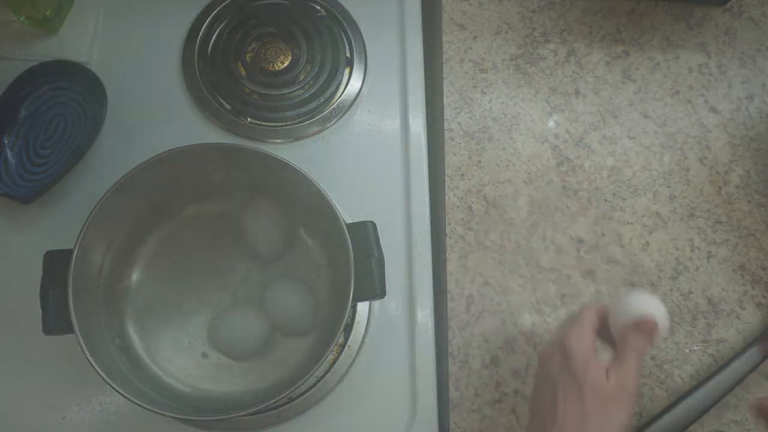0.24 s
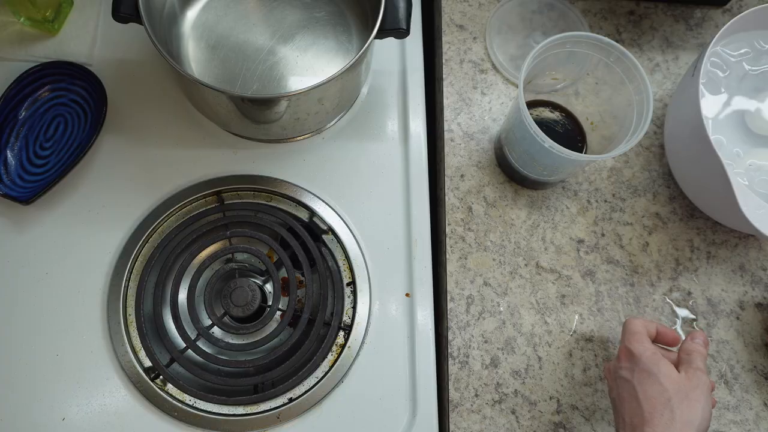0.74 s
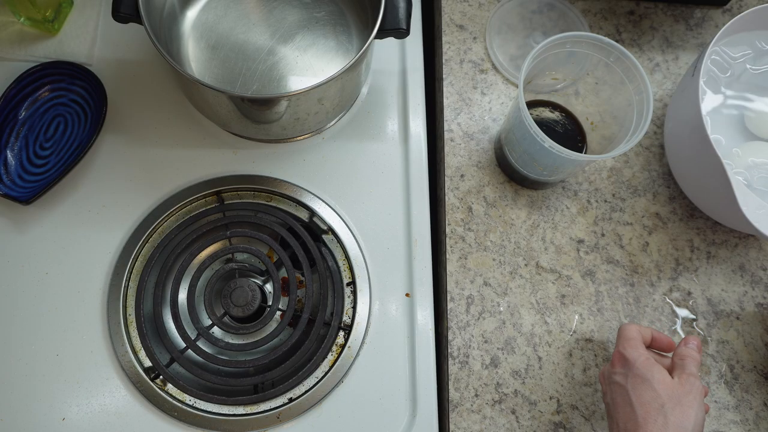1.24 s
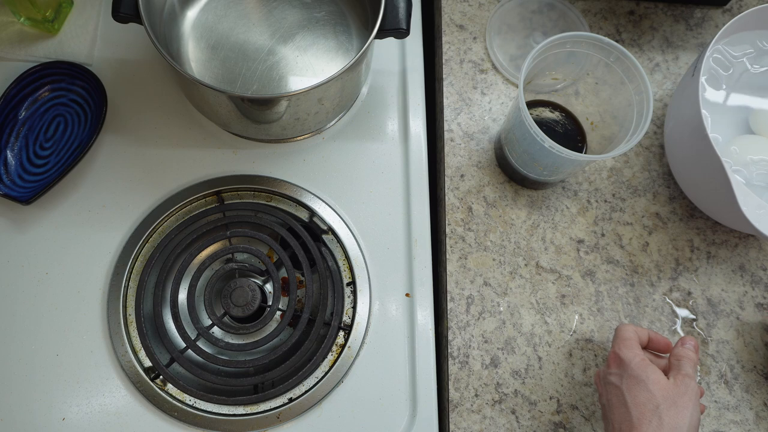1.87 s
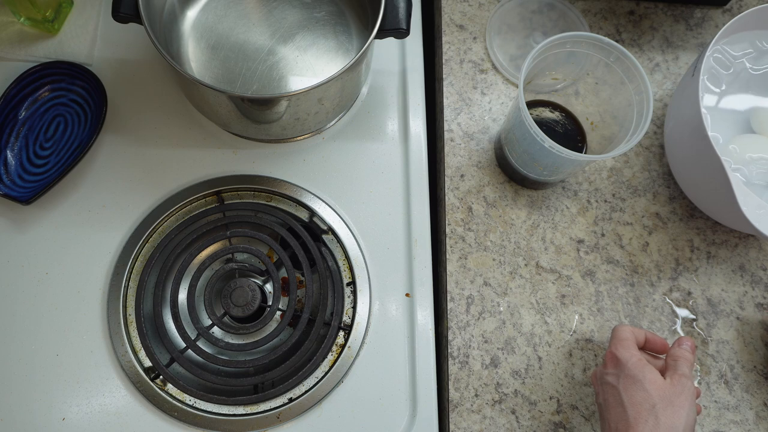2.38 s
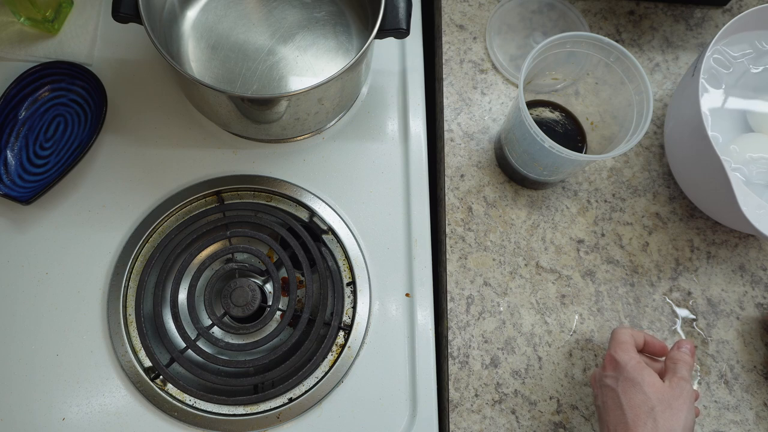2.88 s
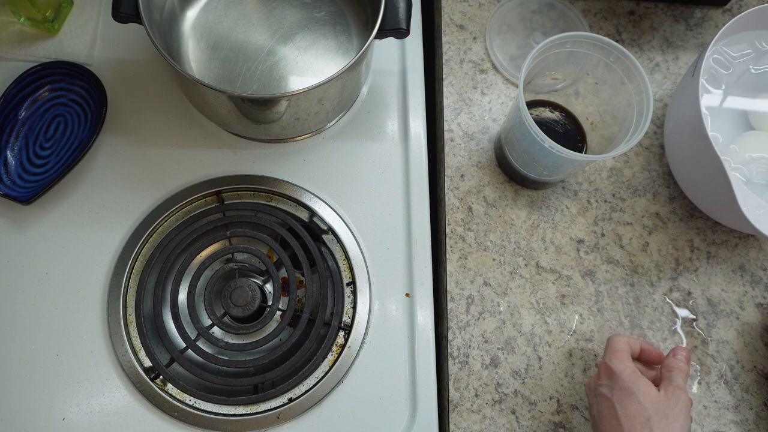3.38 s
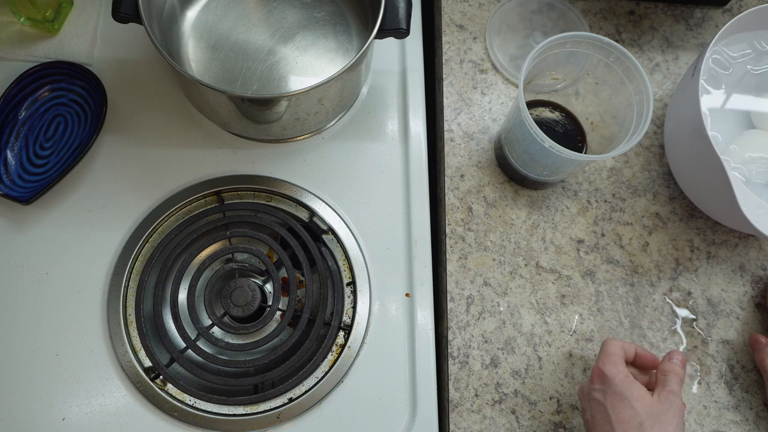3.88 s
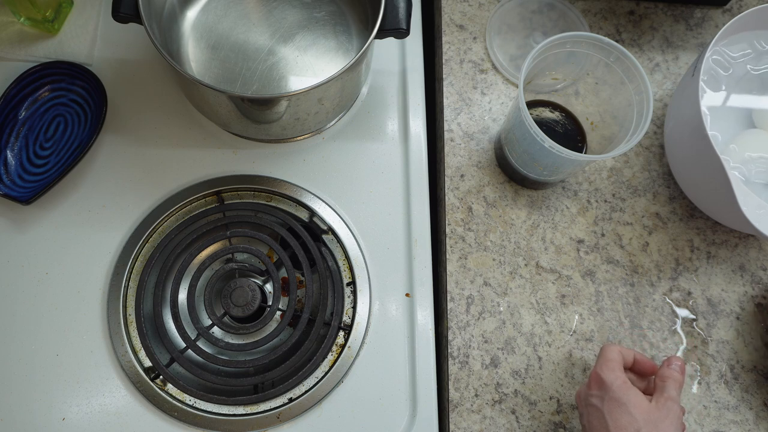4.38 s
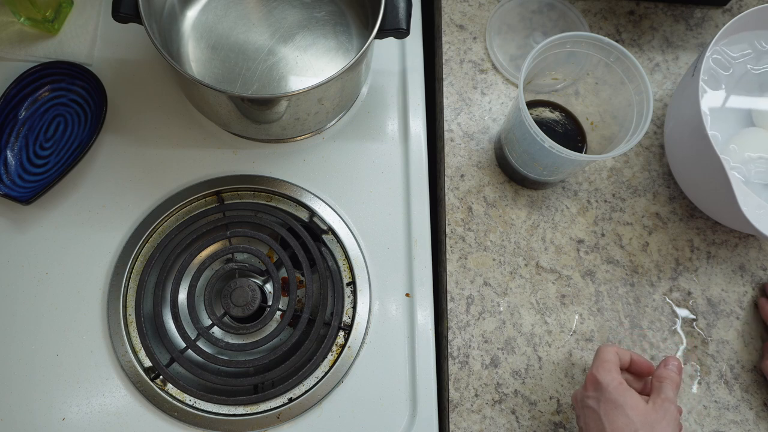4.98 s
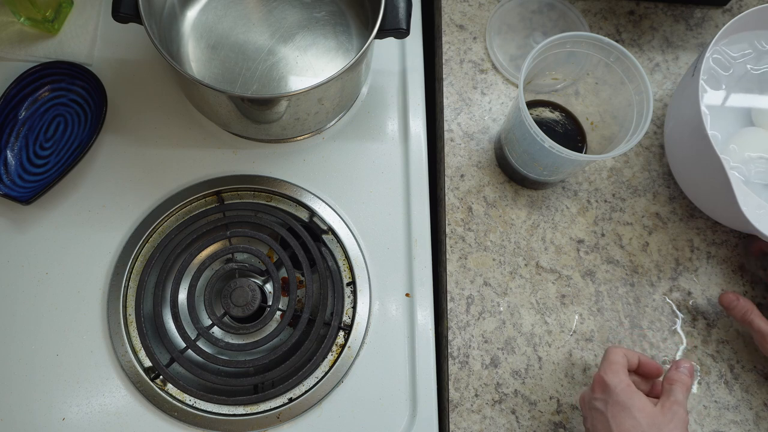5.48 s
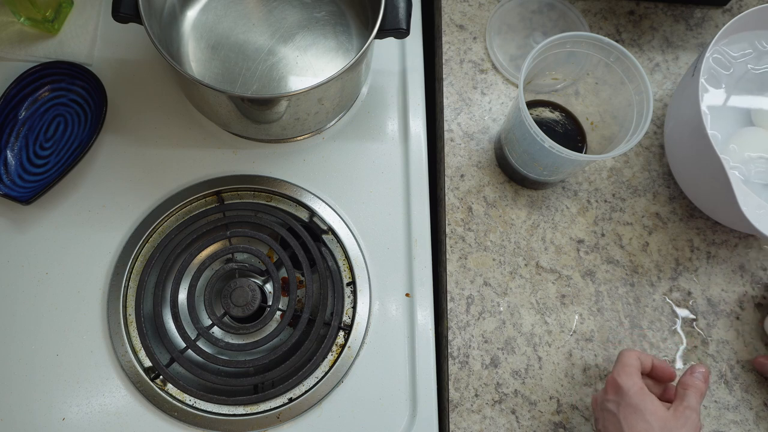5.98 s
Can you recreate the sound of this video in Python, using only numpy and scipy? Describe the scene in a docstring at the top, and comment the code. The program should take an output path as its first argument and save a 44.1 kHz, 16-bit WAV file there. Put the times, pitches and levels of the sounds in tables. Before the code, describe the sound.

A boiled egg knocks once on a stone counter, then a hand slides faintly over it above soft hiss. The background switches abruptly to a low fan hum. After a pause come sharp, crunchy egg blows, a little rolling, three quick blows close together, and a final burst of shell crackles. Small, reflective kitchen, heard close from above.

```python
"""Hard knocks of a boiled egg on a stone kitchen countertop, with crunching shell, crackles and a quiet hum.
Each blow rings counter modes and crushes shell as a noise burst; cracks are short tones, flakes grainy bursts.
Shaped noise makes the egg roll. A hand slides and squeaks over a faint background hiss at first; at a cut
this background ends, and fan air as filtered noise begins with wavering tones from noise-fed resonances.
Near echoes, scatter and a decaying tail form the small hard room around the egg, heard from above."""
import sys
import numpy as np
from scipy import signal
from scipy.fft import rfft, irfft, next_fast_len
from scipy.io import wavfile
from scipy.ndimage import uniform_filter1d

SR = 44100
rng = np.random.default_rng(int(sys.argv[2]) if len(sys.argv) > 2 else 0)


def dump_mix(stems):
    """Bounce the given channels to the path in sys.argv[1] as a 16-bit WAV at rate SR."""
    frames = np.atleast_2d(stems).T  # one column per channel
    limited = np.clip(frames, -1, 1)  # hard clip at full scale
    pcm = np.round(limited * 32767).astype(np.int16)
    wavfile.write(sys.argv[1], SR, pcm)


N = 275003
TIME = np.arange(N) / SR
RING = TIME[:SR * 3 // 4]  # time axis of one short sound

SLIDE_S, SLIDE_LENGTH_S = 0.25, 0.33  # middle and length of the hand's stroke
HUM_START_S = 0.643  # cut to another shot: the first background hiss ends, the hum begins
# tone of a breaking flake of shell: [f/Hz, level/dB]
FLAKE_COLOUR = [(100, -21), (400, -2.5), (750, 2.5), (1500, -6.5), (2100, -6), (3000, -4.5), (4500, -10),
                (7000, -6.5), (11000, -6.5), (16000, -23)]


def blows(push_s=0.00078):
    """Each blow rings the counter and crushes some shell; its room return is drawn anew from noise."""
    # egg striking stone: [t/s, strength/dB, hardness/(dB/octave), favoured f/Hz, its boost/dB,
    # its width/octaves, counter ring level/dB, crunch t60/s, room level/dB]
    blow_table = [ (0.0277, 8, -6, 558, 5, 0.29, 2, 0.027, 3),
                  (1.4685, 12, 1.27, 513, 12, 0.8, 3, 0.041, 2),
                  (2.2568, 11, 3.5, 990, 5, 0.74, -0.5, 0.019, 6.5),
                  (2.6843, 12, -1, 533, 8, 0.4, 0, 0.049, -1),
                  (2.9243, 13, 0.4, 1270, 1, 0.24, 3.5, 0.032, -1),
                  (4.4968, 12.5, 0.56, 1800, 6, 0.52, 3, 0.05, -1),
                  (4.692, 11, 1.52, 2600, 2, 0.5, 3, 0.038, -1.5),
                  (4.8743, 11.5, 2.5, 200, 7, 0.37, 1.5, 0.057, 0), ]
    # modes of the counter slab and the cabinet under it: [f/Hz, level/dB, t60/s]
    counter_modes = [ (131.8, -5, 0.095), (157.3, -4, 0.12), (201.6, 3.5, .12), (238.4, -2.5, 0.12),
                     (308.3, 4.5, 0.25), (380.3, 3.5, 0.1), (442, -4.5, 0.06), (500, 1, 0.095),
                     (542.3, 0.5, .06), (646, -5.5, 0.54), (743, -6, 0.044), (809.4, 3.5, 0.11),
                     (864, -2.5, 0.12), (992, -4.5, 0.17), (1169, 3, 0.1153), (1270, 2, 0.073),
                     (1351, -0.5, 0.21), (1392, -10, 0.21), (1542, -10, 0.14), (1702, 0.5, 0.051),
                     (2100, -6, .06), (2233, 2, 0.0753), (2600, -0.5, 0.06), (2840, 5.5, 0.034),
                     (3400, 1.5, 0.027), ]
    # tone of the crushed patch of shell: [f/Hz, level/dB]
    crunch_colour = [(60, -14.5), (250, -17.5), (500, -6.5), (1000, -6), (1600, -2), (1900, -9),
                     (2300, -8.5), (3200, 0), (4300, -2.5), (6000, 1.5), (7000, -3.5), (8400, -1),
                     (9800, -4.5), (16000, -11.5)]
    ring_room_db = -9  # less of the counter ring than of the shell noise goes into the room

    modes = []
    for hz, db, t60 in counter_modes:
        gain = undb(db) * 2 * np.log(1000) / (t60 * SR)  # long rings start softer
        modes.append(gain * fade(t60) * np.sin(2 * np.pi * hz * RING))
    signs = (-1) ** np.arange(len(modes))  # neighbouring modes start in opposite directions
    ring = signs @ np.array(modes)
    push = 1 - np.exp(-RING / push_s)  # the force builds as the egg flattens

    out = np.zeros(N)
    for s, db, hardness_db, spot_hz, spot_db, octaves, ring_db, crunch_t60, room_db in blow_table:
        slab = undb(ring_db) * ring
        shell = colour(burst(push * fade(crunch_t60), grain_db=1.37), crunch_colour)
        room = kitchen(undb(ring_room_db) * slab + shell)[:len(RING)]
        blow = slab + shell + undb(room_db) * room
        blow = colour(blow, contact(db, hardness_db, spot_hz, spot_db, octaves))
        blow = colour(blow, [(25, -18.5), (60, -5.5), (125, -0.5), (190, 2)])  # little deep bass is radiated
        add(out, s, blow)
    return out


def contact(db, hardness_db, spot_hz, spot_db, octaves):
    """A shared force spectrum, brighter for a harder contact, with a hump set by the landing spot."""
    # force that all blows share: [f/Hz, level/dB]
    force_colour = [(190, 0), (300, 3), (440, 1), (600, -1.5), (850, -2), (1400, -8), (2200, -12),
                    (3000, -16.5), (5600, -23.5), (9000, -28), (12000, -33)]
    hardness_from_hz = 450

    hz = np.geomspace(150, 14000, 60)
    bright = hardness_db * np.log2(np.maximum(hz / hardness_from_hz, 1))
    hump = spot_db * np.exp(-(np.log2(hz / spot_hz) / octaves) ** 2)
    return list(zip(hz, db + along(force_colour, hz) + bright + hump))


def snaps():
    """A crack running through the shell is a few cycles of one high pitch."""
    # running cracks: [t/s, f/Hz, peak envelope level/dB, rise time/s]
    snap_table = [(0.89, 3140, -58.5, 0.001), (2.257, 5690, -11, 0.00049), (3.4861, 10000, -24.5, 0.0002),
                  (3.4897, 11600, -33, 0.0001), (4.8332, 13900, -51.5, .00012)]

    out = np.zeros(N)
    for s, hz, db, rise in snap_table:
        envelope = RING / rise * np.exp(1 - RING / rise)  # peaks at 1 after the rise time
        add(out, s, undb(db) * envelope * np.sin(2 * np.pi * hz * RING))
    return out


def crackles(grain_db=3.0, rise_s=0.00017):
    """Short grainy bursts with their own decay and tilt: breaking shell, and one echo of a blow."""
    # grainy bursts: breaking pieces, and at 4.8838 s an echo of the blow:
    # [t/s, level/dB, treble tilt/(dB/octave), t60/s]
    crackle_table = [ (0.047, -21, -8, 0.027), (0.710, -29.5, -10, 0.063), (1.057, -31.5, -5, 0.05),
                     (1.827, -32, -10, 0.06), (4.205, -37, -2.5, 0.038), (4.8838, 6, -1, 0.033),
                     (4.9456, -7.5, -1.5, 0.021), (5.122, -26.5, -3, 0.096), (5.291, -27.5, -5.5, 0.049),
                     (5.521, -30.5, 0, 0.35), (5.586, -27, -0.5, 0.035), (5.5967, -12.5, -3.5, 0.096),
                     (5.603, -12, -1, 0.045), (5.6227, -20, 2.5, 0.025), (5.637, -13.5, -1, 0.04),
                     (5.6638, -9, -4.5, 0.046), ]

    out = np.zeros(N)
    rise = 1 - np.exp(-RING / rise_s)
    for s, db, tilt_db, t60 in crackle_table:
        crackle = burst(rise * fade(t60), grain_db)
        add(out, s, undb(db) * colour(crackle, FLAKE_COLOUR, tilt_db))
    return out


def rolls(grain_db=4):
    """The uneven shell rolls and drags in bumps of random size that make the counter mutter."""
    # rolling and dragging: [middle t/s, length/s, rms level at the middle/dB]
    roll_table = [(0.008, 0.22, -49), (1.763, 0.017, -60), (3.167, 0.065, -56.5), (3.231, 0.054, -57.5),
                  (3.278, 0.027, -47.5), (3.423, 0.1, -48.5)]
    # tone of the muttering counter: [f/Hz, level/dB]
    roll_colour = [(80, -42), (240, -15.5), (330, 7), (420, 3.5), (520, -1.5), (620, -16), (780, -7.5),
                   (1000, -19), (1300, -15), (2000, -31), (4500, -32.5), (5500, -33), (7000, -41),
                   (12000, -47)]

    push = sum(undb(db) * swell(s, length) for s, length, db in roll_table)
    bumps = rng.standard_normal(N) * undb(grain_db * rng.standard_normal(N))
    return push * level(colour(bumps, roll_colour), 0)


def grit(scatter_db=3, tilt_db=-2.0):
    """Crumbs of shell under the sliding hand give faint ticks at random moments."""
    ticks_per_s, tick_db, tick_t60_s = 18, -35, 0.045

    out = np.zeros(N)
    chance = rng.uniform(-1, 1, (int(ticks_per_s * SLIDE_LENGTH_S), 2))
    for place, size in chance:
        tick = colour(burst(fade(tick_t60_s)), FLAKE_COLOUR, tilt_db)
        add(out, SLIDE_S + place * SLIDE_LENGTH_S / 2, undb(tick_db + scatter_db * size) * tick)
    return out


def hand_slide():
    """Skin over stone swells above a steady background hiss; skin that catches squeaks at one resonance."""
    # tone of the slide and the background hiss: [f/Hz, level/dB]
    slide_colour = [(30, 1), (130, -6), (450, -1), (1300, -5), (2200, -12), (4300, -16.5), (7000, -18),
                    (10000, -21.5), (16000, -32)]
    # catching skin: [middle t/s, length/s, rms level at the middle/dB]
    squeak_table = [(0.267, 0.27, -74), (0.41, 0.18, -73)]
    slide_db, background_db, squeak_hz = -72.5, -68, 3650

    hiss_gain = undb(background_db) + undb(slide_db) * swell(SLIDE_S, SLIDE_LENGTH_S)
    squeak_gain = sum(undb(db) * swell(s, length) for s, length, db in squeak_table)
    hiss = hiss_gain * level(colour(rng.standard_normal(N), slide_colour), 0)
    squeak = squeak_gain * whistle(squeak_hz, t60=0.008)
    return (hiss + squeak) * (1 - hum_running())


def appliance_hum():
    """A steady wash of fan air, as filtered noise, with wavering tones from noise-fed resonances."""
    # tone of the fan air: [f/Hz, level/dB]
    air_colour = [(15, -33.5), (25, -20), (97, -3), (161, -12.5), (200, -7.5), (344, -13.5), (489, -7.5),
                  (607, -19.5), (677, -11), (988, -20.5), (1230, -12), (1370, -20.5), (1700, -19.5),
                  (2000, -23.5), (16000, -49)]
    # fan and motor tones: [f/Hz, rms level/dB]
    hum_tones = [(118.4, -73), (296.1, -74.5), (1044, -77), (1222, -76), (1685, -81.5)]
    air_db = -62.5  # rms

    air = level(colour(rng.standard_normal(N), air_colour), air_db)
    tones = sum(undb(db) * whistle(hz, t60=0.37) for hz, db in hum_tones)
    return (air + tones) * hum_running()


def hum_running():
    """Gain that ramps from 0 to 1 in 2.7 ms at the cut between the two backgrounds."""
    return np.clip((TIME - HUM_START_S) / 0.0027, 0, 1)


def kitchen(x, early_db=-3, early_t60=0.1713, late_db=-5.5, build_s=0.0027):
    """Room return from one spot: two near echoes, a quick scatter off stove and cupboards, a longer tail."""
    # decay of the room's tail: [f/Hz, t60/s]
    room_t60 = [(100, 0.32), (300, 0.55), (700, 0.43), (1400, 0.57), (3000, 0.43), (6000, 0.42),
                (10000, 0.31), (16000, 0.32)]
    # nearby hard surfaces: [delay/s, level/dB]
    echoes = [(.0028, -28.5), (.0082, -14)]

    hz = np.arange(len(RING) // 2 + 1) * SR / len(RING)
    arrive = 1 - np.exp(-(RING / build_s) ** 2)
    longest = max(t60 for _, t60 in room_t60)
    diffuse = rfft(burst(arrive * fade(longest)))
    # each band dies at its own rate
    tail = 0
    for centre, t60 in room_t60:
        share = along([(f, f == centre) for f, _ in room_t60], hz)
        band = irfft(diffuse * share, len(RING))
        tail = tail + band * fade(t60) / fade(longest)
    # the scatter is weighted toward the bass
    scatter = burst(arrive * fade(early_t60))
    scatter = colour(scatter, [(150, 5), (500, 2), (1200, 2.0), (16000, -4.5)])
    response = undb(early_db) * scatter + undb(late_db) * tail
    for delay, db in echoes:
        response[int(delay * SR)] += undb(db)
    return signal.fftconvolve(x, response)[:N]


def burst(envelope, grain_db=0):
    """Tiny clicks of uneven size under an envelope, with unit energy and a nearly even spectrum."""
    sizes = np.repeat(rng.standard_normal(len(RING)), 16)[:len(RING)]  # each size lasts 16 samples
    outline = envelope * undb(grain_db * sizes) + 1e-12
    x = rng.standard_normal(len(RING)) * outline
    # flatten the spectrum, then restore the outline
    for _ in range(2):
        spectrum = rfft(x)
        x = irfft(spectrum / np.abs(spectrum), len(RING))
        local_power = np.abs(uniform_filter1d(x ** 2, size=128))
        x *= outline / np.sqrt(local_power + 1e-18)
    return x / np.linalg.norm(x)


def whistle(hz, t60):
    """Noise that keeps one resonance ringing; rms 1."""
    resonance = fade(t60) * np.sin(2 * np.pi * hz * RING)
    return level(signal.fftconvolve(rng.standard_normal(N), resonance)[:N], 0)


def swell(s, length):
    """A smooth rise and fall around time s, about 17 dB down at either end of its length."""
    return np.exp(-2 * ((TIME - s) / length * 2) ** 2)


def fade(t60):
    """Exponential decay by 60 dB in t60 seconds."""
    return np.exp(-np.log(1000) * RING / t60)


def colour(x, points, tilt_db=0):
    """Causal minimum-phase filter through (Hz, dB) points, tilted above 1.5 kHz about 3 kHz."""
    n = 2 * next_fast_len(len(x))
    hz = np.arange(n // 2 + 1) * SR / n
    db = along(points, hz) + tilt_db * np.log2(np.maximum(hz, 1500) / 3000)
    # folding the cepstrum forward in time gives minimum phase
    cepstrum = irfft(np.log(undb(db)))
    cepstrum[1:n // 2] *= 2
    cepstrum[n // 2 + 1:] = 0
    return irfft(rfft(x, n) * np.exp(rfft(cepstrum)))[:len(x)]


def along(points, hz):
    """Read (Hz, value) points on a log-frequency axis."""
    f, value = np.transpose(points)
    return np.interp(np.log(hz + 1), np.log(f), value)


def undb(db):
    """Decibels to gain."""
    return 10 ** (np.asarray(db) / 20)


def level(x, db):
    """Set the rms level."""
    return x * undb(db) / np.sqrt(np.mean(x ** 2))


def add(out, s, x):
    """Mix x in at time s."""
    i = max(int(s * SR), 0)
    out[i:i + len(x)] += x[:N - i]


def scene():
    """Egg, shell and hand in the kitchen; snaps, crackles and rolls share one room response."""
    snap, crackle, roll = snaps(), crackles(), rolls()
    room = kitchen(undb(-13) * snap + undb(-2.5) * crackle + undb(-3.5) * roll)
    egg = blows() + snap + crackle + roll + room
    return (egg + grit() + hand_slide() + appliance_hum())[None]


def record(dry):
    """A steep elliptic low-pass cuts the top."""
    top_hz = 16200
    return signal.sosfilt(signal.ellip(10, 0.2, 70, top_hz, fs=SR, output="sos"), dry)


dry = scene()
out = record(dry)
dump_mix(out)
```